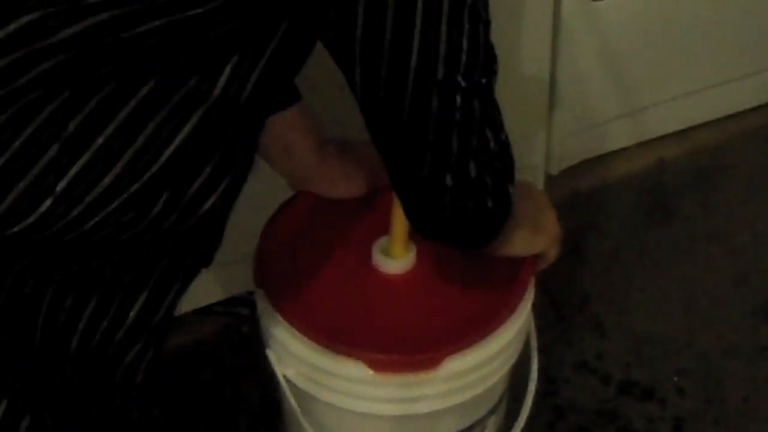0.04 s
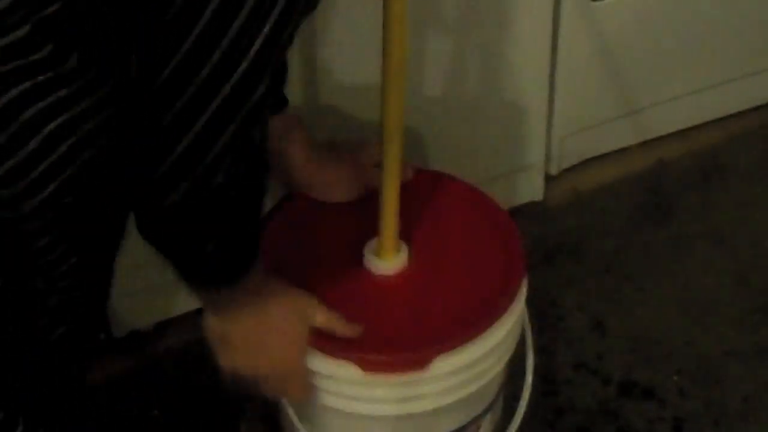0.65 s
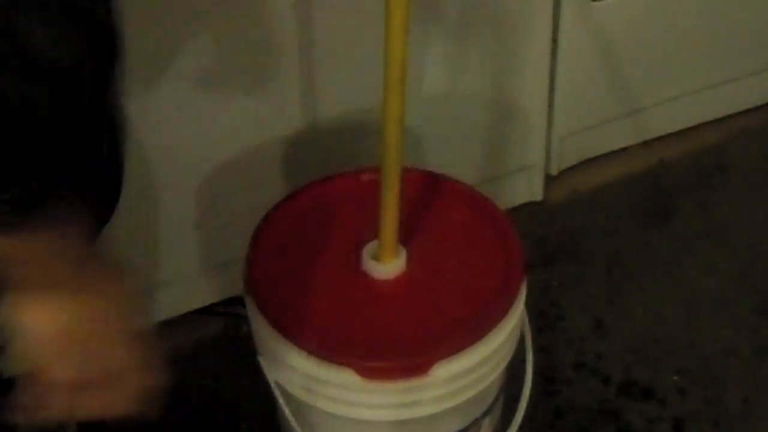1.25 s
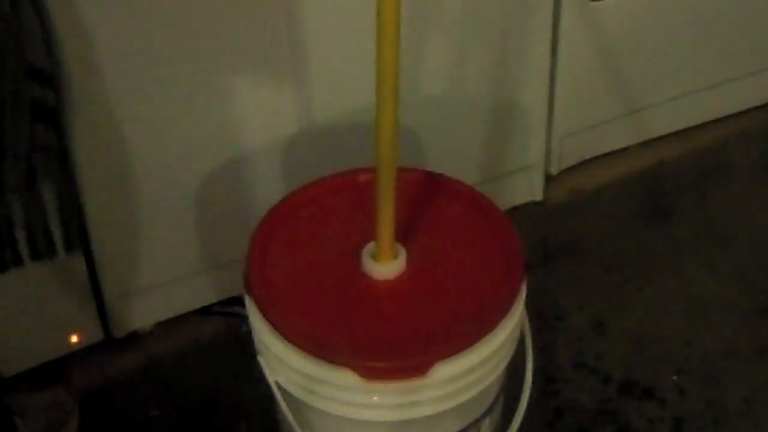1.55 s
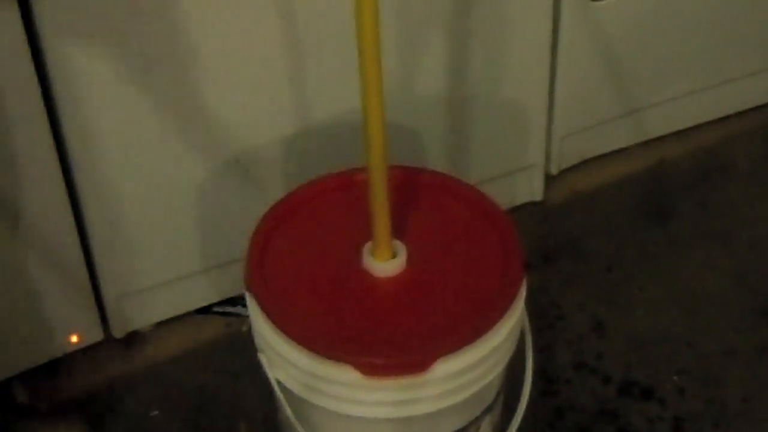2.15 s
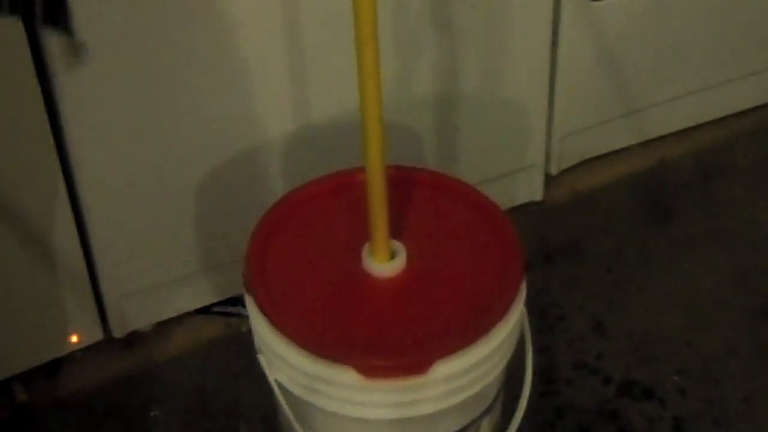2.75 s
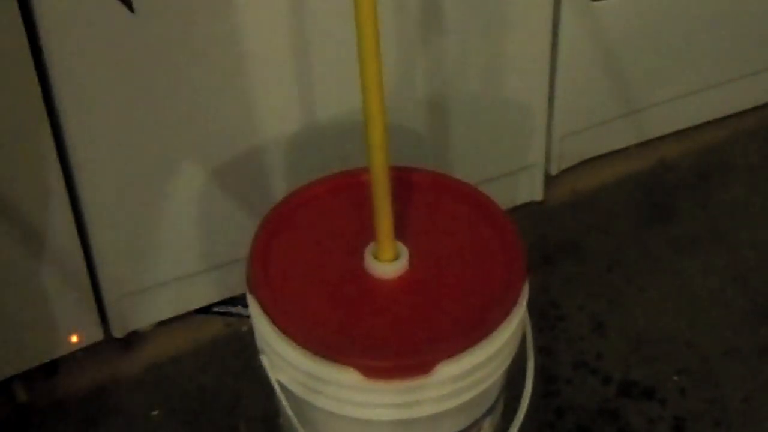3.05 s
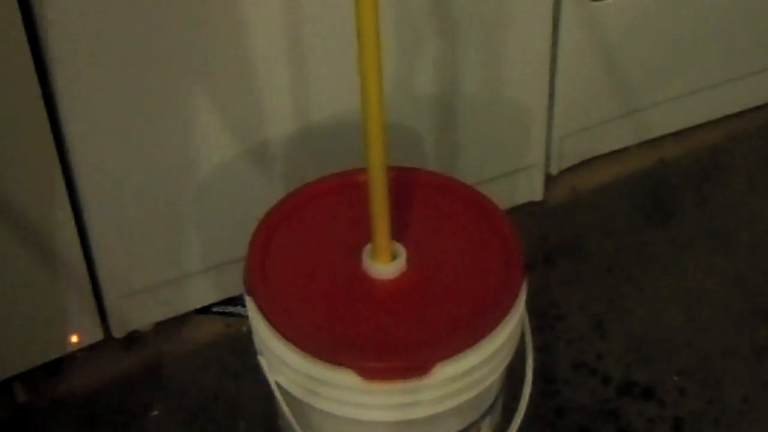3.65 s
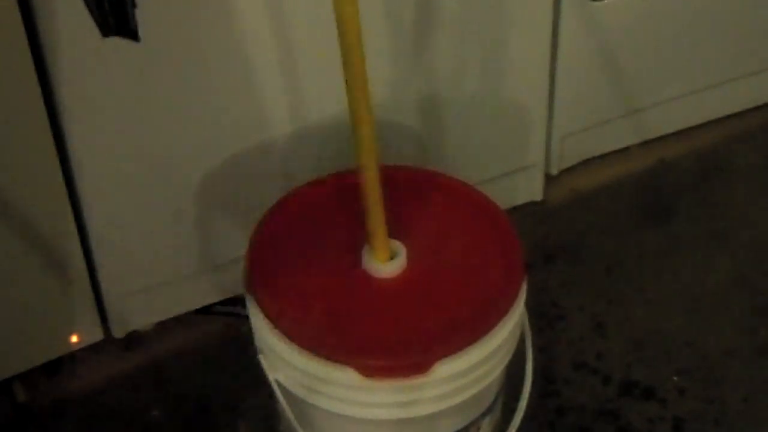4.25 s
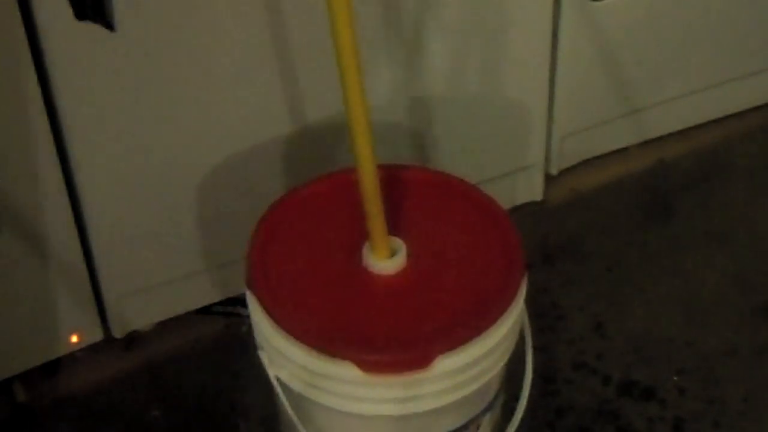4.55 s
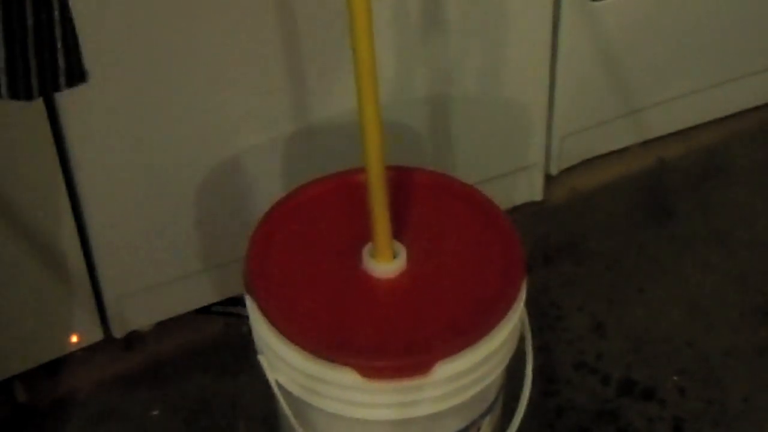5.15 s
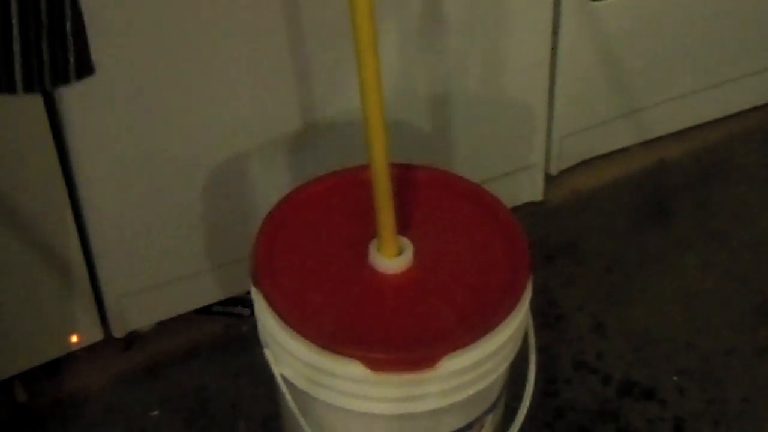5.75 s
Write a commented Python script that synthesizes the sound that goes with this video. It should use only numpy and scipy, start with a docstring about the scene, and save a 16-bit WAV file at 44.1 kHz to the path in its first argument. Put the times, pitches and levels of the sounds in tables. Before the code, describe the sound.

One loud plastic snap, followed by a wooden stick scraping and clacking up and down in a hollow bucket over a faint hum.

```python
"""A small bare room. A plastic lid snaps onto a bucket, its rim jumping the bead in quick steps.
A wooden stick is then worked up and down through a collar in the lid: it rubs, groans, squeaks and
clacks in the collar and thumps on the bucket's bottom. Sleeves brush past over a faint hum.
Automatic gain ducks at the snap and creeps back; a thin, steady electronic whine is heard louder
as the gain recovers."""
import sys
import numpy as np
from scipy import signal
from scipy.fft import rfft, irfft, next_fast_len
from scipy.io import wavfile
from scipy.ndimage import uniform_filter1d, map_coordinates

SR = 44100
rng = np.random.default_rng(int(sys.argv[2]) if len(sys.argv) > 2 else 0)


def master(y):
    """Save y as 16-bit WAV."""
    cut = np.clip(np.atleast_2d(y).T, -1, 1)
    pcm = np.round(cut * 32767)  # scale
    wavfile.write(sys.argv[1], SR, pcm.astype(np.int16))


N = 260631

# Rim steps over the bead. Each row: start in seconds, relative level in dB.
RIM_STEPS = [(0.0912, -15.5), (0.0938, 8), (0.0988, 5.5), (0.11, 4), (0.1147, 7.5)]
# Lid resonances. Each row: frequency in Hz, width in Hz, gain in dB.
LID_MODES = [(427, 23, 8), (423, 45, -2), (1030, 66, 0.5), (1390, 140, -5), (1770, 97, -2),
             (2000, 570, -5.5), (3783, 280, -9.5), (6650, 250, -11), (7800, 220, -13)]
# Rim crack. Each row: frequency in Hz, spectral density in dB.
CRACK_SPECTRUM = [(60, -26), (150, -10.5), (320, -4.5), (420, -1), (800, -8.5), (1050, 2), (1800, -1),
                  (3000, -11), (4000, -8.5), (5800, -4.5), (8000, -12), (11000, -21.5), (14000, -33.5)]

def lid_snap(seating_db_per_s=350):
    """Each step of the rim cracks and rings the lid, which rings less as it seats and stiffens."""
    out = np.zeros((2, N))
    lid = unit_hit(ring(signal.unit_impulse(SR // 4), LID_MODES))
    for start_s, db in RIM_STEPS:
        crack = unit_hit(coloured(burst(t60_s=0.044), CRACK_SPECTRUM))
        lid_db = -10 - seating_db_per_s * (start_s - RIM_STEPS[0][0])
        add(out, start_s, amp(db) * (amp(-8.5) * crack + amp(lid_db) * lid))
    return room(out, wet_db=-12.5, dull_hz=1250)


# Stick landings. Each row: start in seconds, relative boom and tick levels in dB.
LANDINGS = [(2.649, -2.5, -31), (3.846, -5, -24), (5.05, -12, -57)]
# Loaded bottom and wall. Each row: frequency in Hz, width in Hz, gain in dB.
BOTTOM_MODES = [(35.5, 8.4, -10.5), (112, 12.1, -16.5), (157.5, 41, -17.5), (239.4, 14, -8.5),
                (292, 30, -6), (393, 56, 0.5), (443, 8.9, -3.5), (693, 27, -10.5), (953, 110, 2.5),
                (1550, 360, 1)]

def stick_thumps():
    """The stick's blunt foot pushes the bottom down and booms the bucket; its shaft scuffs the collar."""
    out = np.zeros((2, N))
    bottom = ring(-signal.unit_impulse(SR // 4), BOTTOM_MODES)
    boom = unit_hit(soft(bottom, edge_hz=353, order=3))
    for start_s, boom_db, tick_db in LANDINGS:
        tick = unit_hit(coloured(burst(t60_s=0.048), HISS_SPECTRUM))
        add(out, start_s, amp(boom_db - 10.5) * boom + amp(tick_db - 7.5) * tick)
    return room(out, wet_db=-8.5)


# Lid and the air under it. Each row: frequency in Hz, width in Hz, gain in dB.
BUCKET_MODES = [(297, 32, -10), (388, 39, -2.5), (444.2, 5.7, -1.5), (652, 30, -23.5), (847, 87, -19.5),
                (1030, 230, -19)]

def bucket_body(x):
    """The bucket driven at its lid, which hardly moves the deep modes."""
    return filtered(ring(x, BUCKET_MODES), lambda hz: (1j * hz / (1j * hz + 170)) ** 2)


def hollow_note(edge_hz):
    """One soft tap on the lid rings the bucket."""
    return unit_hit(soft(bucket_body(signal.unit_impulse(SR // 4)), edge_hz, order=3))


# Knocks on collar and lid. Each row: start in seconds, clack level in dB, clack pitch in Hz,
# body level in dB, tick level in dB. Levels are relative.
COLLAR_KNOCKS = [(0.726, -25, 825, -22, -41), (0.765, -32, 920, -28, -41.5), (1.47, -37.5, 1560, -32, -46),
                 (1.685, -32.5, 1070, -23.5, -43.5), (1.778, -40, 780, -36, -39.5),
                 (1.923, -41, 728, -31.5, -44), (2.217, -23.5, 1050, -24.5, -33),
                 (2.248, -23.5, 900, -28, -55), (2.452, -34.5, 1210, -28, -58),
                 (2.523, -25, 1132, -18.5, -27), (2.765, -33, 1140, -41, -31),
                 (2.893, -34, 750, -27.5, -29), (3.587, -24, 820, -20.5, -42), (3.613, -31, 847, -28, -40),
                 (3.792, -34, 698, -32, -26), (3.92, -24.5, 849.5, -22, -51), (3.947, -25.5, 830, -29, -59),
                 (4.063, -29, 846, -32, -33), (4.129, -18, 840, -15, -25), (4.209, -30, 1690, -41, -41),
                 (4.464, -27, 780, -18, -58), (4.731, -24.5, 920, -23.5, -56), (4.805, -31, 830, -25, -58),
                 (4.899, -36, 954, -28, -49), (4.984, -23, 866, -17.5, -39), (5.243, -10, 1470, -23, -32)]

def collar_knocks():
    """Stick and hands strike: a hollow note of the bucket, a clack of the collar, a bright tick."""
    out = np.zeros((2, N))
    hollow = hollow_note(edge_hz=770)
    for start_s, clack_db, hz, body_db, tick_db in COLLAR_KNOCKS:
        collar = ring(burst(t60_s=0.045), [(hz, 0.33 * hz, 0)])
        clack = unit_hit(soft(collar, edge_hz=2.07 * hz, order=2))
        tick = unit_hit(coloured(burst(t60_s=0.037), HISS_SPECTRUM))
        knock = amp(body_db - 14.5) * hollow + amp(clack_db - 16.5) * clack + amp(tick_db - 12.5) * tick
        add(out, start_s, knock)
    return room(out, wet_db=-4)


# Stick strokes. Each row: time of full speed, rise and fall in seconds, relative level in dB,
# hiss trim in dB.
STICK_STROKES = [(2.022, 0.074, 0.16, -44.5, 2.5), (2.211, 0.2, 0.26, -42.5, -0.5),
                 (2.563, 0.14, 0.13, -33, 0), (2.658, 0.05, 0.029, -35.5, 3),
                 (2.909, 0.072, 0.046, -42.5, 3.5), (3.188, 0.12, 0.093, -45.5, -1.5),
                 (3.569, 0.082, 0.078, -40.5, 2.5), (3.852, 0.16, 0.052, -41, 6.5),
                 (3.94, 0.089, 0.2, -56, -8), (4.069, 0.012, 0.053, -35.5, 1.5),
                 (4.492, 0.32, 0.17, -38.5, -4), (4.779, 0.21, 0.13, -40.5, -2),
                 (4.9, 0.071, 0.079, -37, -5), (4.988, 0.022, 0.095, -32, 0),
                 (5.265, 0.26, 0.11, -37.5, 6.5), (5.442, 0.52, 0.17, -42, -1),
                 (5.88, 0.19, 0.15, -38, -5.5)]
# Light rubbing between strokes. Each row: time in seconds, relative level in dB.
LIGHT_RUB = [(0.4, -63), (1.602, -62.5), (2.002, -49.5), (2.699, -55.5), (3.401, -65), (3.998, -48.5),
             (4.402, -55.5), (5.302, -64), (5.7, -61.5)]
# Collar friction, mid rasp and bright hiss. Each row: frequency in Hz, spectral density in dB.
RASP_SPECTRUM = [(290, -28.5), (500, -25), (714, -10), (821, 0), (1550, -8), (2050, -8), (2680, -11.5),
                 (3360, -17.5), (3760, -28.5), (4000, -14.5), (5200, -41.5), (8800, -120)]
HISS_SPECTRUM = [(1500, -21.5), (3000, -8), (4600, -5), (6200, -0.5), (8000, -1.5), (9300, -7),
                 (12000, -14), (14000, -19.5)]

def stick_sliding(drone_db=-41.5, drone_lag_s=0.035, typical_stroke_db=-42):
    """Friction in the collar rasps, hisses and sets the bucket droning and rattling."""
    times_s, light_db = np.transpose(LIGHT_RUB)
    light = amp(np.interp(np.arange(N) / SR, times_s, light_db))
    rasp_power, hiss_power = light ** 2, (amp(-6.5) * light) ** 2
    for peak_s, rise_s, fall_s, db, hiss_db in STICK_STROKES:
        stroke = amp(db) * swell(peak_s, rise_s, fall_s)
        rasp_power += stroke ** 2
        hiss_power += (amp(hiss_db) * stroke) ** 2
    pole = np.exp(-1 / (drone_lag_s * SR))
    drive = np.sqrt(signal.lfilter([1 - pole], [1, -pole], rasp_power)) / amp(typical_stroke_db)
    rub = friction() * amp(2.3 * wobble(35))
    body = unit(soft(bucket_body(rub), edge_hz=1200, order=2))
    drone = amp(drone_db) * drive ** 0.95 * (body + stick_rattle())
    rasp = np.sqrt(rasp_power) * unit(wandering_contact(coloured(rub, RASP_SPECTRUM), depth_db=2.5))
    hiss = np.sqrt(hiss_power) * unit(wandering_contact(coloured(rub, HISS_SPECTRUM), depth_db=3))
    return drone + room(amp(-4.5) * rasp + amp(-1) * hiss, wet_db=-9, dull_hz=1130)


def friction(grain_db=2, catches_per_s=150, catch_db=11.5):
    """Uneven grains of rubbing, with tiny ticks where the surfaces catch."""
    grains = noise(N) * amp(grain_db * wobble(450))
    catches = (rng.random(N) < catches_per_s / SR) * rng.standard_normal(N)
    return grains + amp(catch_db) * catches


def wandering_contact(x, depth_db):
    """Narrow resonances come and go as the point of contact wanders."""
    spectra = signal.stft(x, nperseg=512)[2]
    patches = uniform_filter1d(rng.standard_normal(spectra.shape[1:]), size=4, axis=0)
    patches = uniform_filter1d(patches, size=9, axis=1)
    return signal.istft(spectra * amp(depth_db * unit(patches)), nperseg=512)[1][:, :N]


def stick_rattle(taps_per_s=12, spread_db=2):
    """Small random taps of the loose stick, each a hollow note of the bucket."""
    taps = (rng.random(N) < taps_per_s / SR) * amp(spread_db * rng.standard_normal(N))
    return amp(-0.5) * signal.fftconvolve(taps, hollow_note(edge_hz=750))[:N]


# Groans in the collar. Each row: start and length in seconds, slip rate in Hz, level in dB.
COLLAR_GROANS = [(2.025, 0.015, 410, -44), (2.246, 0.044, 452, -41), (3.59, 0.026, 365, -19.5),
                 (4.469, 0.07, 455, -36), (5.172, 0.055, 450, -39.5)]

def collar_groans():
    """Stick-slip: a short, rounded sawtooth pull with a wavering rate and uneven slips."""
    out = np.zeros((2, N))
    for start_s, length_s, slip_hz, db in COLLAR_GROANS:
        n = int(length_s * SR)
        phase = 2 * np.pi * np.cumsum(slip_hz * (1 + 0.0037 * wobble(260)[:n])) / SR
        pull = sum(np.sin(k * phase) * k ** -3.2 for k in range(1, 4))
        grip = amp(4 * wobble(359)[:n]) * arch(n) ** 0.11
        add(out, start_s, amp(db) * grip * pull)
    return room(out, wet_db=-12.5)


# Squeaks in the collar. Each row: start and length in seconds, first and last pitch in Hz, level in dB.
COLLAR_SQUEAKS = [(2.074, 0.018, 4720, 5060, -45), (2.331, 0.013, 7930, 6800, -42),
                  (2.545, 0.053, 2104, 3040, -39)]

def collar_squeaks(width_hz=690, stutter_hz=237.5, stutter_db=2):
    """Stuttering slips excite a narrow resonance that glides as the contact moves along the stick."""
    out = np.zeros((2, N))
    for start_s, length_s, first_hz, last_hz, db in COLLAR_SQUEAKS:
        n = int(length_s * SR)
        phase = 2 * np.pi * np.cumsum(np.linspace(first_hz, last_hz, n)) / SR
        resonance = wobble(width_hz)[:n] * np.sin(phase) + wobble(width_hz)[:n] * np.cos(phase)
        slips = amp(stutter_db * wobble(stutter_hz)[:n])
        add(out, start_s, amp(db) * np.sqrt(arch(n)) * unit(resonance * slips))
    return room(out, wet_db=-23)


# Sleeve and hand passes. Each row: time of full speed, rise and fall in seconds, level in dB.
SLEEVE_PASSES = [(0.57, 0.039, 0.17, -44), (1.0, 0.081, 0.07, -47), (1.349, 0.45, 0.36, -56.5),
                 (1.872, 0.2, 0.12, -41.5)]
# Cloth hiss. Each row: frequency in Hz, spectral density in dB.
CLOTH_SPECTRUM = [(700, -27), (1500, -13), (3500, -10), (5500, -4), (7800, 1), (11000, -9), (14000, -13)]

def sleeve_brushes():
    """Cloth and skin pass over the lid with a smooth, airy hiss."""
    power = sum((amp(db) * swell(*timing_s)) ** 2 for *timing_s, db in SLEEVE_PASSES)
    cloth = unit(coloured(noise(N), CLOTH_SPECTRUM))
    return room(np.sqrt(power) * cloth, wet_db=-9.5, dull_hz=1121)


# Machine hum. Each row: frequency in Hz, level in dB.
HUM_TONES = [(92, -56), (120, -68.5), (157, -69)]
# Room noise. Each row: frequency in Hz, spectral density in dB.
AIR_SPECTRUM = [(20, -4.5), (95, -3), (250, -10), (400, -17), (520, -17), (1100, -26), (3000, -28),
                (8300, -31), (12000, -34.5), (14000, -47)]

def background(whine_hz=12857, whine_db=-63, gain_dip_db=14.5, recovery_s=1.3, air_db=-50):
    """Low room noise, a wavering hum and a thin, steady whine, heard louder as the gain recovers."""
    t = np.arange(N) / SR
    def tone(hz, db, waver_rad):
        return amp(db) * np.sqrt(2) * np.sin(2 * np.pi * hz * t + waver_rad * wobble(19))
    hum = sum(tone(hz, db, waver_rad=1.6) for hz, db in HUM_TONES)
    recovering_gain = amp(-gain_dip_db * np.exp(-t / recovery_s))  # set curve, on the whine only
    whine = tone(whine_hz, whine_db, waver_rad=0.6) * recovering_gain
    return hum + whine + amp(air_db) * unit(coloured(noise(N), AIR_SPECTRUM))


# Wall echoes. Each row: delay in seconds, linear gain.
WALL_ECHOES = [(0.0015, 0.84), (0.0081, 0.38), (0.0104, 0.22), (0.0129, 0.34), (0.0206, 0.27),
               (0.0214, 0.3)]
# Room decay. Each row: frequency in Hz, T60 in seconds.
ROOM_T60 = [(100, 0.44), (400, 0.26), (1800, 0.33), (6000, 0.25), (12000, 0.2)]

def room(x, wet_db, dull_hz=2600, build_s=0.015):
    """Near walls throw back dull echoes; a diffuse tail builds up and dies."""
    def walls(hz):
        delays = sum(gain * np.exp(-2j * np.pi * hz * delay_s) for delay_s, gain in WALL_ECHOES)
        return delays / (1 + 1j * hz / dull_hz)
    hz, t, spectra = signal.stft(noise(SR // 2), SR, nperseg=256)
    fade = amp(-60 * t / along(ROOM_T60, hz)[:, None]) * (1 - np.exp(-(t / build_s) ** 2))
    tail = signal.istft(spectra * fade, SR, nperseg=256)[1]
    reverb = signal.fftconvolve(x, tail / np.linalg.norm(tail[0]), axes=1)[:, :N]
    return x + filtered(x, walls) + amp(wet_db) * reverb


# Stereo likeness. Each row: frequency in Hz, left-right correlation.
COHERENCE = [(100, 0.98), (600, 0.96), (1400, 0.96), (3000, 0.88), (6400, 0.72), (13000, 0.21)]

def noise(size):
    """White stereo noise, alike in the bass and diverging in the treble."""
    def mid_side_gains(hz):
        angle = np.arccos(np.clip(along(COHERENCE, hz), -1, 1)) / 2
        return np.array([np.cos(angle), np.sin(angle)])
    mid, side = filtered(rng.standard_normal((2, size)), mid_side_gains)
    return np.array([mid + side, mid - side])


def burst(t60_s):
    """A decaying puff of stereo noise."""
    t = np.arange(SR // 4) / SR
    return noise(len(t)) * amp(-60 * t / t60_s)


def swell(peak_s, rise_s, fall_s, edge_db=-25.5, roundness=1.18):
    """Gain of one sliding move: it speeds up to its peak and slows again."""
    t = np.arange(N) / SR - peak_s
    away = np.maximum(-t / rise_s, t / fall_s)
    return amp(edge_db * np.abs(away) ** roundness)


def arch(n):
    """Half-sine envelope of n samples."""
    return np.abs(np.sin(np.linspace(0, np.pi, n)))


def wobble(knots_per_s):
    """A smooth random curve."""
    knots = rng.standard_normal(int(N * knots_per_s / SR) + 4)
    return map_coordinates(knots, [np.arange(N) * knots_per_s / SR])


def soft(x, edge_hz, order):
    """Low-pass: a soft contact holds no treble."""
    return signal.sosfilt(signal.butter(order, min(edge_hz, 0.4 * SR), fs=SR, output="sos"), x)


def ring(x, modes):
    """x through parallel resonances."""
    return filtered(x, lambda f: sum(amp(db) * 1j * f * width / (hz * hz - f * f + 1j * f * width)
                                     for hz, width, db in modes))


def coloured(x, spectrum):
    """x shaped by (Hz, dB) points."""
    return filtered(x, lambda hz: amp(along(spectrum, hz)))


def filtered(x, response):
    """x through a complex frequency response."""
    n = x.shape[-1]
    padded = next_fast_len(n + SR // 4)
    return irfft(rfft(x, padded) * response(np.fft.rfftfreq(padded, 1 / SR)), padded)[..., :n]


def along(points, hz):
    """Interpolate (Hz, value) points on a log axis."""
    knots_hz, values = np.transpose(points)
    return np.interp(np.log(hz + 1), np.log(knots_hz + 1), values)


def amp(db):
    """Decibels to gain."""
    return 10 ** (np.asarray(db) / 20)


def unit(x):
    """x at rms 1."""
    return x / np.sqrt(np.mean(x ** 2) + 1e-20)


def unit_hit(x):
    """x with the energy of 20 ms at rms 1."""
    return x / np.sqrt(np.mean(np.sum(x ** 2, axis=-1)) / (SR / 50))


def add(track, start_s, sound):
    """Mix a sound into the track."""
    part = track[:, round(start_s * SR):][:, :sound.shape[-1]]
    part += sound[..., :part.shape[1]]


# Microphone pair. Each row: frequency in Hz, left minus right in dB.
MIC_BALANCE = [(200, -1.93), (1200, -1.6), (4500, -1), (6500, -4), (8500, 6.5), (11500, -6)]

def scene():
    """The bucket stands a little to the right; each microphone port has its own treble colour."""
    mix = lid_snap() + stick_thumps() + collar_knocks() + collar_groans() + collar_squeaks()
    mix = mix + stick_sliding() + sleeve_brushes() + background()
    return filtered(mix, lambda hz: amp(np.outer([0.5, -0.5], along(MIC_BALANCE, hz))))


def record(dry, limit_db=9, release_db_per_s=9, ceiling=0.92, top_hz=14250):
    """Gain control ducks at a peak and recovers slowly; a soft clip and a steep low-pass follow."""
    recovery_db = release_db_per_s * np.arange(N) / SR
    over_db = np.maximum(20 * np.log10(np.abs(dry).max(axis=0) + 1e-9) - limit_db, 0)
    duck_db = np.maximum.accumulate(over_db + recovery_db) - recovery_db
    ducked = dry * amp(-uniform_filter1d(duck_db, size=64))
    clipped = ducked / (1 + np.abs(ducked / ceiling) ** 6) ** (1 / 6)
    return filtered(clipped, lambda hz: 1 / (1 + (hz / top_hz) ** 120))


dry = scene()
out = record(dry)
master(out)
```